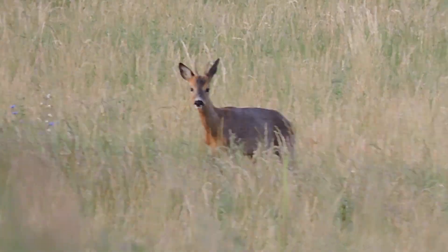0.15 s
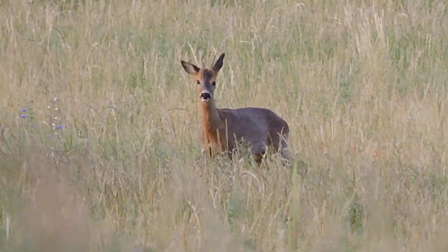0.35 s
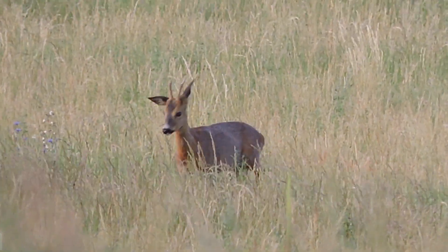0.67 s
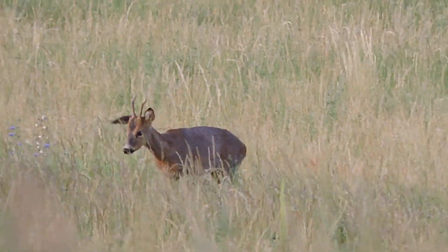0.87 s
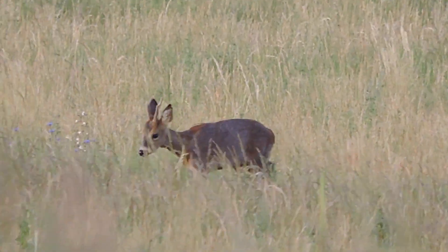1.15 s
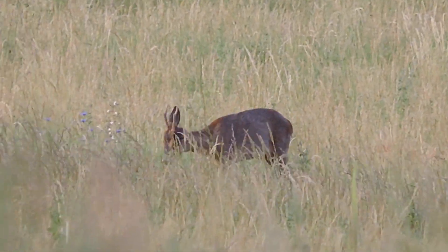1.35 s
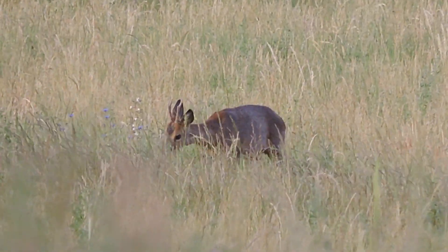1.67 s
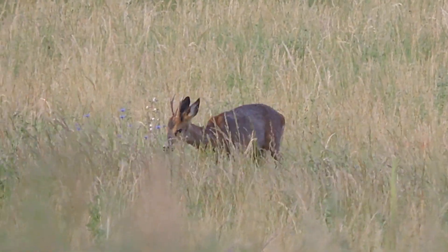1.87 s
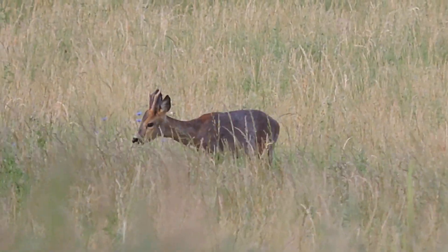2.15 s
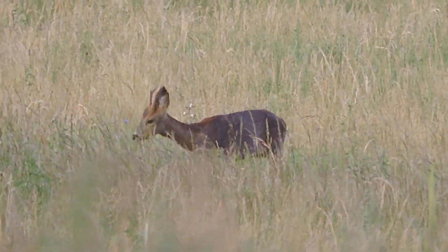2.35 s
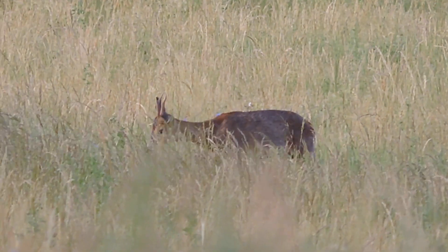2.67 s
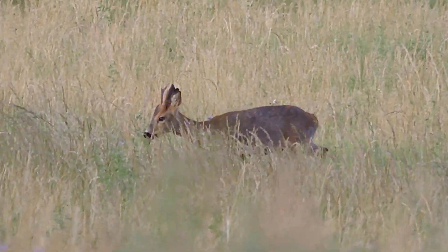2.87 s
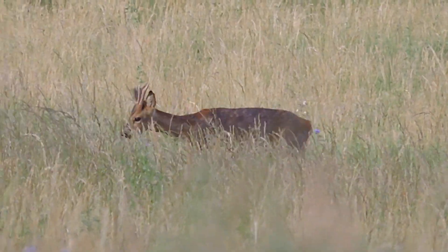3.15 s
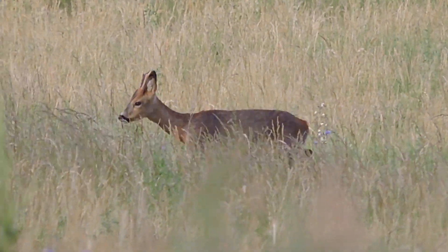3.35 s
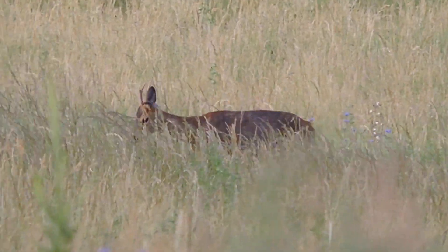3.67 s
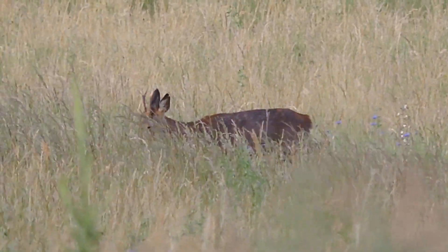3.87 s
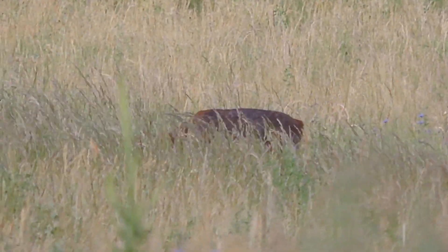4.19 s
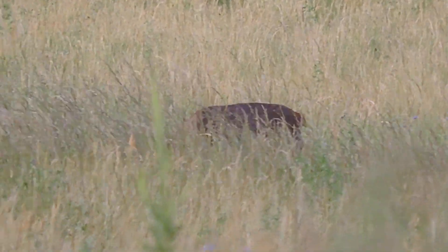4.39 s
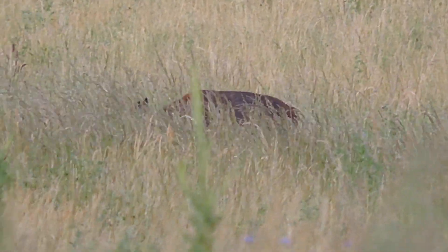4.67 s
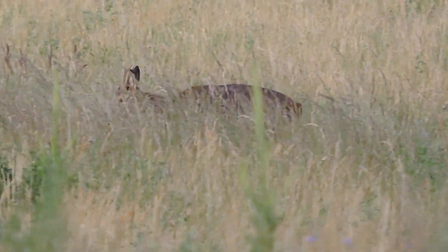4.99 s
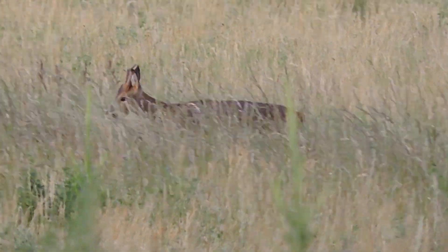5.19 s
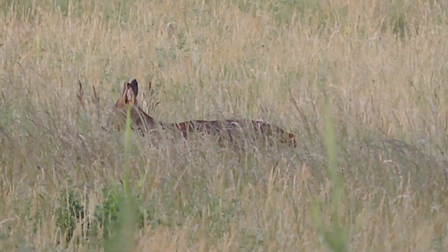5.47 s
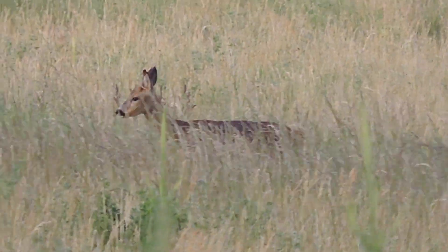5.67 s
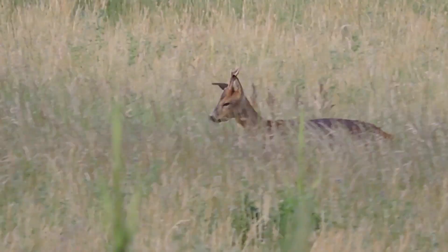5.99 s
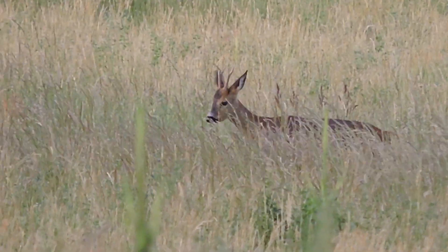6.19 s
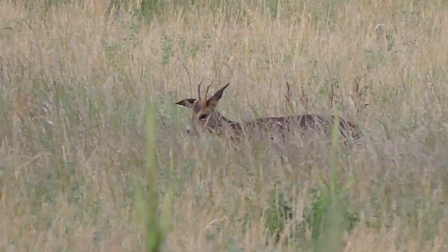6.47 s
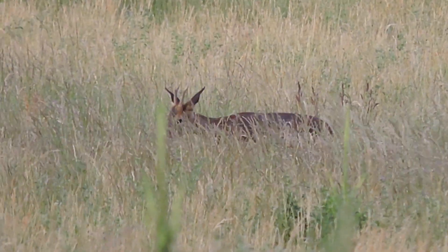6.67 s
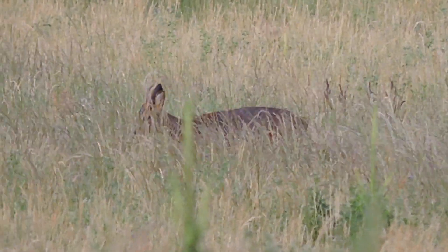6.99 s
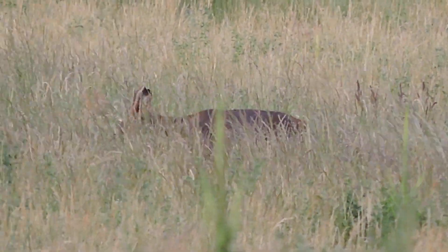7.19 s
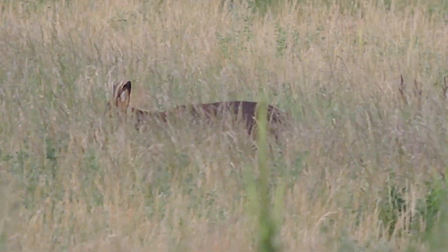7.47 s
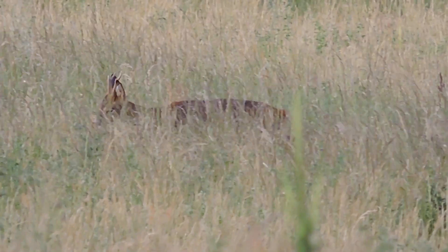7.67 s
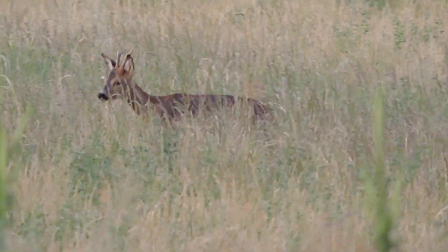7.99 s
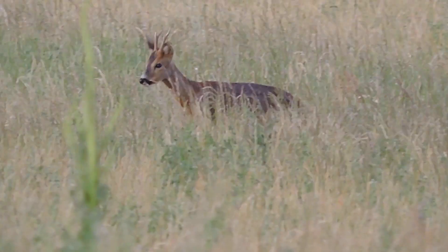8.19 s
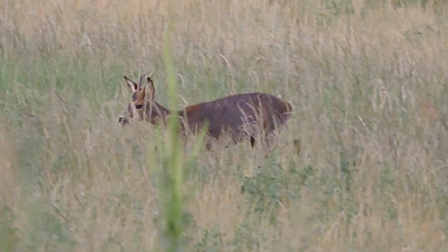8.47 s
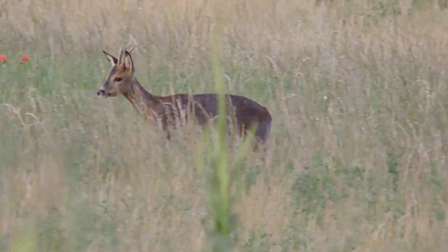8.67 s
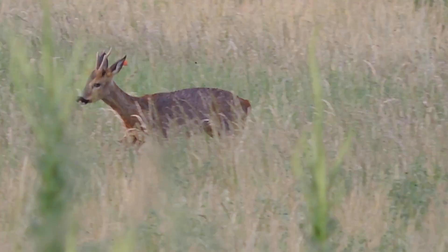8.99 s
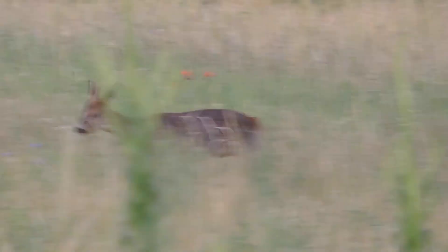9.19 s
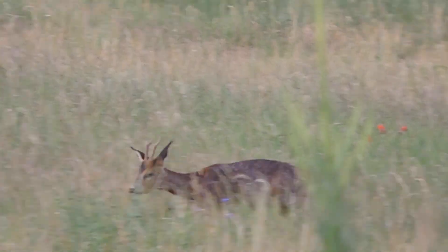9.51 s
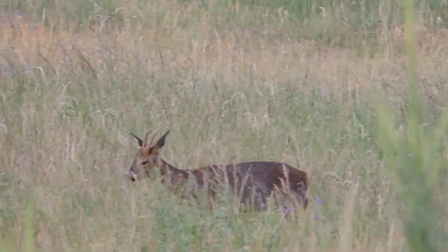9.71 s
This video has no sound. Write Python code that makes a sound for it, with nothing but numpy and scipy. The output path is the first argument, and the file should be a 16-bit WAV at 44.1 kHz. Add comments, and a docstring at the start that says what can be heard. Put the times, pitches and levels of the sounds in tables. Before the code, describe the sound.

Low wind rumble thumps at the microphone and fades to light puffs as crickets chirp rhythmically and a faint far bird calls across open grassland.

```python
"""An open meadow on a summer evening, with a murmur of air, a low distant drone and a faint high tone.
A near field cricket, a fainter neighbour and a far chorus sing: chirps are bursts of whistled wing strokes.
Wind, made of shaped noise, buffets two microphone ports, hard at first and then in light puffs.
A far bird whistles falling notes, and dry grass stems tick as tiny bursts of noise."""
import sys
import numpy as np
from scipy import signal
from scipy.fft import rfft, irfft, next_fast_len
from scipy.io import wavfile

SR = 44100
rng = np.random.default_rng(int(sys.argv[2]) if len(sys.argv) > 2 else 0)


def master(y):
    """Save y as 16-bit WAV."""
    cut = np.clip(np.atleast_2d(y).T, -1, 1)
    pcm = np.round(cut * 32767)  # scale
    wavfile.write(sys.argv[1], SR, pcm.astype(np.int16))


N = 433925   # length in samples

# In stereo columns, a positive left-right value means louder on the left.
# tone colour of the distant murmur: (f/Hz, level/dB per Hz)
AIR_SPECTRUM = [(15, -30), (28, -5.5), (65, 7), (100, 3), (150, -2.5), (200, -4.5), (250, -9), (320, -14),
                (440, -15), (620, -10), (780, -12.5), (1100, -9.5), (1700, -15.5), (4000, -25), (5200, -32),
                (8800, -99)]
# slow swells of the murmur: (t/s, change of level/dB)
AIR_SWELL = [(0, 0.9), (3.2, 0.1), (3.7, 1.5), (4.1, 0.15), (6, 0.86), (7.7, 0.5), (8.15, 1.5), (8.6, 0),
             (9.84, 1)]
# tone colour of the steady high hiss: (f/Hz, level/dB per Hz)
HISS_SPECTRUM = [(2500, -10), (4000, -5), (5500, 2), (7000, 0), (9000, -2), (12000, -4), (16000, -4)]
# how alike the background is at the two ports: (f/Hz, likeness: 1 same, 0 unrelated, -1 opposite)
PORT_LIKENESS = [(60, 3), (280, 0.74), (640, 0.4), (1300, 0.41), (2000, -0.05), (2700, 0), (3800, -0.21),
                 (6000, 0), (15000, 0)]
# stereo balance of the background: (f/Hz, left-right/dB)
PORT_BALANCE = [(60, -2.5), (200, -3.5), (700, -2), (1300, -3.5), (2400, 2.5), (4400, 0.5), (8000, .5),
                (15000, 0.8)]
# rise and fall of the far low drone, like traffic beyond the fields: (t/s, level/dB)
DRONE_LEVELS = [(3.3, -63), (3.83, -55), (4.1, -62.5), (4.3, -53.5), (4.85, -57), (5.15, -64.5),
                (5.35, -53.5), (5.57, -59.5), (6.0, -55), (6.65, -53), (7.4, -60.5), (7.95, -66.5),
                (8.15, -56), (8.7, -61), (9.84, -54.5)]
# tone colour of the drone: (f/Hz, level/dB per Hz)
DRONE_SPECTRUM = [(120, -20), (190, -0.5), (260, 4), (340, -2), (460, -16.5), (620, -8.5), (800, -18.5),
                  (1500, -54)]
# thin high tone and its weaker companions: (f/Hz, rms level before a shared gain/dB)
HIGH_TONES = [(15520, -98), (15570, -84), (15620, -101)]
# dry stems ticking: (t/s, level before filter and shared gain/dB)
GRASS_TICKS = [(1.2376, -67), (1.4491, -64), (2.9811, -69), (7.5946, -63)]

# single far bird chirps: (t/s, length/s, start f/Hz, end f/Hz, level before a shared gain/dB)
SINGLE_CHIRPS = [(.433, 0.039, 1374, 868, -57.5), (1.041, 0.025, 1346, 880, -51.5),
                 (1.071, 0.023, 1740, 1280, -62), (1.408, .06, 1527, 1385, -62.5),
                 (4.249, 0.035, 2200, 1830, -64), (5.673, 0.033, 1250, 1046, -58),
                 (5.665, 0.048, 2560, 2170, -66), (5.697, 0.0287, 2190, 1300, -60),
                 (5.714, .026, 1980, 1150, -57)]
# low note leading into the bird's call: (time ahead of the call/s, length/s, start f/Hz, end f/Hz)
LEAD_IN_NOTE = (.048, 0.056, 1390, 1210)
# slurs of one call: (t into the call/s, length/s, start f/Hz, end f/Hz, level within the call/dB,
# sag: 0 is a straight slide, larger bends sooner)
CALL_SLURS = [(-.025, 0.06, 2700, 2370, -14, .1), (-.002, 0.0367, 1900, 1370, 1, 0.97),
              (0.011, .1, 2300, 1554, -3.5, 2.1)]
# two hoarse notes trailing after it: (t into the call/s, start f/Hz, fall/Hz per s)
TRAILING_NOTES = [(.07, 2070, 1610), (.11, 1512, 1310)]
# the bird's calls, before a shared gain: (t/s, level/dB, lead-in level/dB, length of trailing notes/s,
# upper trailing note level/dB, lower trailing note level/dB)
BIRD_CALLS = [(5.897, -57, -54.5, .24, -64, -68), (6.372, -60, -54.5, 0.15, -70, -63.5),
              (6.857, -64, -63.5, .14, -68, -71), (7.355, -63, -70, 0.17, -70, -71)]

# underlying breeze, fresh at first and then nearly still: (t/s, buffeting before a shared gain/dB, left-right/dB)
BREEZE_LEVELS = [(0, -37, -1), (.65, -37, -8), (1.05, -33, -4.5), (1.7, -33, -3.5), (1.92, -39, -8),
                 (2.35, -33, -10), (2.55, -46, -3), (3.35, -41.5, -2), (3.58, -59.5, 2), (4.5, -52.5, -6),
                 (5.2, -61, -1), (7.4, -53.5, -7), (7.8, -62, -4), (9.84, -48.5, -4)]
# gusts on top of it: (t/s, hold/s, buffeting before a shared gain/dB, left-right/dB)
GUST_EVENTS = [(0.15, 0.17, -26, -13), (0.761, 0.058, -33, -10), (1.216, 0.028, -33, -29),
               (1.463, 0.092, -28.5, -13.5), (1.602, 0.041, -28, -12.5), (2.071, 0.13, -31, -13),
               (2.27, 0.045, -32.5, -14), (2.412, 0.066, -34.5, -13), (2.597, .17, -35, -8),
               (2.974, 0.043, -35, -6), (3.164, 0.065, -37.5, -7), (3.94, 0.072, -49.5, -7),
               (4.538, 0.14, -46, -1), (4.755, 0.11, -47, -1), (6.75, 0.377, -44, -10),
               (7.217, 0.035, -49, -20), (9.179, 0.05, -41.5, 17), (9.427, 0.22, -47, 8),
               (9.619, 0.076, -39.5, 21)]
# tone colour of buffeting at the reference strength: (f/Hz, level/dB per Hz)
BUFFET_SPECTRUM = [(20, -3), (40, 2), (80, 1.5), (130, -3), (200, -6), (300, -18.5), (450, -31),
                   (700, -49.5), (1200, -60)]
# single eddies thumping mostly the right port: (t/s, peak level before a shared gain/dB)
THUMP_EVENTS = [(0.125, -32), (0.159, -27.5), (0.232, -22.5), (0.274, -24.5), (0.338, -26), (1.521, -30.5),
                (1.564, -27.5), (1.636, -28.5), (2.092, -27.5), (2.148, -32), (2.211, -23)]

# neighbour's wing strokes: (time ahead of the last one/s, length/s, level within the chirp/dB)
NEIGHBOUR_WING_STROKES = [(.13, .016, -6), (.1, .018, -4), (.069, .021, -1), (.035, .022, 0), (0, .022, 0)]
# the neighbour slows a little as it sings: (chirp number, t of last stroke/s)
NEIGHBOUR_BEAT = [(0, .08), (4, 1.085), (11, 2.85), (16, 4.115), (21, 5.41), (38, 9.8)]
# near cricket's wing strokes: (time ahead of the last one/s, length/s, level within the chirp/dB)
NEAR_WING_STROKES = [(.085, .012, -5.5), (.061, .017, -1), (.033, .019, 0), (0, .020, .5)]
# its even beat, which shifts now and then: (chirp number, t of last stroke/s)
NEAR_BEAT = [(0, .181), (8, 1.872), (10, 2.333), (13, 2.984), (14, 3.221), (26, 5.676), (34, 7.345),
             (40, 8.613), (46, 9.85)]
# how strongly its song arrives: (t/s, level before a shared gain/dB)
NEAR_LEVELS = [(.2, -67), (1.05, -54.5), (1.5, -54), (2.5, -62.5), (3.35, -60.5), (4.05, -69.5),
               (4.66, -61), (5.3, -66), (6.1, -65.5), (6.6, -57.5), (7.05, -69), (8.0, -65.5), (9.84, -68)]

AIR_DB = -53.5
HOARSE_HZ = 45   # how far the trailing notes' pitch trembles
GUST_REF_DB = -25.5   # wind strength at which the buffeting has its table's tone colour
GUST_ATTACK_S, GUST_RELEASE_S = 0.035, 0.044   # time to swell and to die away by a factor e
CHIRP_SPREAD_DB, STROKE_SPREAD_DB = 1.2, .8   # neighbour's chirps; every cricket's strokes
FIELD_T60_S = 0.37   # time for the scattered tail to fall by 60 dB
PORT_LOW_CUT_HZ, TOP_CUT_HZ = 19.4, 15750


def from_db(db):
    """Turn decibels into a gain."""
    return 10 ** (np.asarray(db) / 20)


def rms_one(x):
    """Scale a sound to an average strength (rms) of 1."""
    return x / np.sqrt(np.mean(x ** 2) + 1e-20)


def in_time(rows):
    """Read each column of a time curve at every sample."""
    s, *columns = np.transpose(rows)
    t = np.arange(N) / SR
    return [np.interp(t, s, column) for column in columns]


def at_hz(points, hz):
    """Read a frequency curve on a logarithmic pitch scale."""
    point_hz, values = np.transpose(points)
    return np.interp(np.log(hz), np.log(point_hz), values)


def drift(rate):
    """Smooth random wandering with spread 1, changing about rate times a second."""
    step = 40   # samples between computed points
    keep = np.exp(-2 * np.pi * rate * step / SR)
    noise = rng.standard_normal(N // step + 2002)
    slow = signal.lfilter([1], [1, -2 * keep, keep ** 2], noise)[2000:]   # drop the filter's start-up
    return np.interp(np.arange(N) / step, np.arange(len(slow)), rms_one(slow))


def band(x, low, high):
    """Keep only the frequencies between low and high."""
    sos = signal.butter(2, [low, min(high, .48 * SR)], "band", fs=SR, output="sos")
    return signal.sosfilt(sos, x)


def half_octaves(count):
    """Give the edges of half-octave bands from 20 Hz upwards."""
    edges = 20 * 2 ** (np.arange(count + 1) / 2)
    return zip(edges, edges[1:])


def panned(pan_db):
    """Left and right gains that keep the total power equal."""
    gains = from_db([pan_db / 2, -pan_db / 2])
    return gains / np.sqrt(np.mean(gains ** 2, axis=0))


def add(out, s, sound):
    """Mix a short sound into a track at time s."""
    i = max(round(s * SR), 0)
    out[..., i:i + sound.shape[-1]] += sound[..., :max(N - i, 0)]


def field(x, wet_db):
    """Add a soft tail scattered by the field and its far edge, different at each port."""
    t = np.arange(int(FIELD_T60_S * SR)) / SR
    fade = from_db(-60 * t / FIELD_T60_S)
    build_up = 1 - np.exp(-t / 0.011)
    tail = rng.standard_normal((2, len(t))) * fade * build_up
    tail /= np.sqrt(np.sum(tail ** 2, axis=1, keepdims=True))
    scattered = signal.fftconvolve(np.atleast_2d(x), tail, axes=1)[:, :N]
    return x + from_db(wet_db) * scattered


def ambience(spectrum):
    """Noise from all around, most alike at both ports in the bass; rms 1."""
    size = next_fast_len(N)
    hz = np.maximum(np.arange(size // 2 + 1) * SR / size, 1)
    mid, side = rfft(rng.standard_normal((2, size)))
    alike = np.clip(at_hz(PORT_LIKENESS, hz), -1, 1)
    ports = np.sqrt(1 + alike) * mid + np.sqrt(1 - alike) * side * [[1], [-1]]
    coloured = ports * from_db(at_hz(spectrum, hz)) * panned(at_hz(PORT_BALANCE, hz))
    return rms_one(irfft(coloured, size)[:, :N])


def murmur():
    """Open country blends into a distant murmur that slowly swells."""
    swell_db, = in_time(AIR_SWELL)
    return from_db(AIR_DB + swell_db + .5 * drift(15.0)) * ambience(AIR_SPECTRUM)


def hiss(level_db):
    """Steady noise lying mostly in the treble."""
    return from_db(level_db) * ambience(HISS_SPECTRUM)


def drone():
    """Low noise, like traffic beyond the fields, rises and falls."""
    level_db, = in_time(DRONE_LEVELS)
    return from_db(level_db + 1.3 * drift(15.0)) * ambience(DRONE_SPECTRUM)


def whine(level_db):
    """A thin high tone throbs as weaker tones 50 Hz to either side beat against it."""
    t = np.arange(N) / SR
    return sum(np.sqrt(2) * from_db(db + level_db) * np.sin(2 * np.pi * hz * t) for hz, db in HIGH_TONES)


def grass(level_db, decay_s, low_hz, high_hz):
    """A dry stem snaps with a tiny bright burst of noise."""
    out = np.zeros((2, N))
    t = np.arange(SR // 20) / SR
    for s, db in GRASS_TICKS:
        burst = np.exp(-t / decay_s) * rng.standard_normal((2, len(t)))
        add(out, s, from_db(db + level_db) * burst)
    return band(out, low_hz, high_hz)


def slur(length, start_hz, end_hz, sag, tremble_hz):
    """A nearly pure falling whistle; sag bends the slide, and a trembling pitch makes it hoarse."""
    u = np.linspace(0, 1, int(length * SR))
    slide = end_hz + (start_hz - end_hz) * (1 - u) * np.exp(-sag * u)
    pitch = slide + tremble_hz * drift(120)[:len(u)]
    swell = np.sqrt(np.abs(np.sin(np.pi * u)))
    return swell * np.sin(2 * np.pi * np.cumsum(pitch) / SR)


def bird(level_db, waver, chirp_sag, chirp_tremble_hz, wet_db):
    """Single chirps and four calls of falling whistles waver on their way across the field."""
    song = np.zeros(N)
    for s, length, start_hz, end_hz, db in SINGLE_CHIRPS:
        add(song, s, from_db(db) * slur(length, start_hz, end_hz, chirp_sag, chirp_tremble_hz))
    ahead, *lead_note = LEAD_IN_NOTE
    for s, call_db, lead_db, trail_s, *trail_dbs in BIRD_CALLS:
        add(song, s - ahead, from_db(lead_db) * slur(*lead_note, sag=0, tremble_hz=0))
        for after, length, start_hz, end_hz, db, sag in CALL_SLURS:
            note = slur(length, start_hz, end_hz, sag, tremble_hz=0)
            add(song, s + after, from_db(call_db + db) * note)
        for (after, hz, fall), db in zip(TRAILING_NOTES, trail_dbs):
            note = slur(trail_s, hz, hz - fall * trail_s, sag=0, tremble_hz=HOARSE_HZ)
            add(song, s + after, from_db(db) * note)
    wavering = song * (1 + waver * drift(48))
    return from_db(level_db) * field(wavering, wet_db) * panned(-1.8)[:, None]


def airflow(unsteady_db):
    """Wind strength at each port: gusts swell, hold and die away over the breeze."""
    t = np.arange(N) / SR
    breeze_db, breeze_pan_db = in_time(BREEZE_LEVELS)
    power = (from_db(breeze_db) * panned(breeze_pan_db)) ** 2
    for s, hold, db, pan_db in GUST_EVENTS:
        away = np.maximum((s - t) / GUST_ATTACK_S, (t - s - hold) / GUST_RELEASE_S)
        shape = np.exp(-np.clip(away, 0, 20))   # full strength during the hold
        power += (from_db(db) * panned(pan_db)[:, None] * shape) ** 2
    return np.sqrt(power) * from_db(unsteady_db * np.array([drift(4.6), drift(6.3)]))


def wind(level_db, db_per_octave, lumpy_db, flutter_db, smallest_hz, unsteady_db):
    """Eddies hit each port separately; faster air makes them smaller, so the rumble rises in pitch."""
    out = np.zeros((2, N))
    for port, strength in zip(out, airflow(unsteady_db)):
        speed = 2 ** ((20 * np.log10(strength) - GUST_REF_DB) / db_per_octave)
        white = rng.standard_normal((2, N))
        eddies = 2 * np.tanh(drift(32) / 2)
        power = 0
        for k, (low, high) in enumerate(half_octaves(count=13)):
            hz = np.sqrt(low * high)
            gain = from_db(at_hz(BUFFET_SPECTRUM, hz / speed))
            burst_db = lumpy_db * min(hz / 250, 1.3) * eddies   # small eddies come in stronger bursts
            uneven = from_db(burst_db + flutter_db * drift(11.0))
            port += band(white[k % 2], low, high) * gain * uneven
            power = power + gain ** 2 * (high - low) / (SR / 2)
        port *= strength / np.sqrt(power)
    # eddies smaller than the port cancel across it
    sos = signal.butter(6, smallest_hz, fs=SR, output="sos")
    return from_db(level_db) * signal.sosfilt(sos, out)


def thumps(level_db, width_s, left_db):
    """An eddy crossing the port pushes and pulls, in either order, within a few milliseconds."""
    out = np.zeros(N)
    for s, db in THUMP_EVENTS:
        u = np.linspace(-4, 4, int(8 * SR * width_s * rng.uniform(.85, 1.15)))
        push_pull = rng.choice([-1, 1]) * u * np.exp((1 - u ** 2) / 2)
        add(out, s, from_db(db + level_db) * push_pull)
    return from_db([[left_db], [0]]) * out


def far_chorus(level_db, low_hz, high_hz):
    """Crickets across the field merge into a faint sheen of noise."""
    return from_db(level_db) * rms_one(band(rng.standard_normal((2, N)), low_hz, high_hz))


def beats(pace):
    """Chirp times, evenly spaced between the points of a pace curve."""
    number, when = np.transpose(pace)
    return np.interp(np.arange(number[-1] + 1), number, when)


def wing_stroke(length, hz, droop_hz, overtone_db):
    """The scraper runs along the file; it slows at the end, so the wing's ring sags in pitch."""
    u = np.linspace(0, 1, int(length * SR))
    pitch = hz - droop_hz * (u + u ** 4) / 2
    phase = 2 * np.pi * (np.cumsum(pitch) / SR + rng.random())
    grip = 1 + 0.26 * np.interp(u, np.linspace(0, 1, 10), rng.standard_normal(10))   # teeth catch unevenly
    ring = np.sin(phase) + from_db(overtone_db) * np.sin(2 * phase)
    return grip * np.sin(np.pi * u) * ring


def chirp(strokes, hz, droop_hz, overtone_db):
    """Give each wing stroke of one chirp as (start s, sound), all slightly different."""
    for ahead, length, db in strokes:
        late, louder, sharper, steeper = rng.standard_normal(4)
        stroke = wing_stroke(length, hz + 25 * sharper, droop_hz * (1 + 0.16 * steeper), overtone_db)
        start = .0005 * late - ahead - length / 2
        yield start, from_db(db + STROKE_SPREAD_DB * louder) * stroke


def neighbour_cricket(hz, droop_hz, overtone_db, level_db, pan_db):
    """A fainter cricket with steeper strokes keeps its own beat, in and out of step with the near one."""
    song = np.zeros(N)
    for s in beats(NEIGHBOUR_BEAT):
        gain = from_db(level_db + rng.normal(0, CHIRP_SPREAD_DB))
        for start, stroke in chirp(NEIGHBOUR_WING_STROKES, hz, droop_hz, overtone_db):
            add(song, s + start, gain * stroke)
    return panned(pan_db)[:, None] * song


def near_cricket(hz, droop_hz, overtone_db, level_db, pan_db, uneven_db):
    """The nearest cricket rubs its wings; its song reaches the left port a little later."""
    song = np.zeros(N)
    times = beats(NEAR_BEAT)
    levels = np.interp(times, *np.transpose(NEAR_LEVELS)) + uneven_db * rng.standard_normal(len(times))
    for s, db in zip(times, levels):
        for start, stroke in chirp(NEAR_WING_STROKES, hz, droop_hz, overtone_db):
            add(song, s + start, from_db(db + level_db) * stroke)
    lag = 7   # samples
    return panned(pan_db)[:, None] * np.array([np.roll(song, lag), song])


def scene():
    """Mix the meadow's background, bird, grass and wind with the crickets."""
    background = murmur() + hiss(level_db=-69.5) + drone() + whine(level_db=-4.0)
    stems = grass(level_db=8.5, decay_s=0.0043, low_hz=3500, high_hz=10900)
    calls = bird(level_db=3.5, waver=0.29, chirp_sag=0.26, chirp_tremble_hz=49.5, wet_db=-5.5)
    gusts = wind(level_db=3.0, db_per_octave=16, lumpy_db=5.5, flutter_db=1.5,
                 smallest_hz=676, unsteady_db=0.67)
    gusts += thumps(level_db=10, width_s=0.00096, left_db=-31)
    chorus = far_chorus(level_db=-79.5, low_hz=4320, high_hz=4810)
    neighbour = neighbour_cricket(hz=5100, droop_hz=836, overtone_db=-9.0, level_db=-72.5, pan_db=-3.0)
    near = near_cricket(hz=4842, droop_hz=370, overtone_db=-24, level_db=1.95, pan_db=5.0, uneven_db=0.64)
    crickets = chorus + neighbour + field(near, wet_db=-14.5)
    return background + stems + calls + gusts + crickets


def record(dry):
    """The microphone sheds the deepest rumble, and the top is cut steeply."""
    low_cut = signal.butter(2, PORT_LOW_CUT_HZ, "high", fs=SR, output="sos")
    top_cut = signal.ellip(12, .1, 80, TOP_CUT_HZ, fs=SR, output="sos")
    return signal.sosfilt(top_cut, signal.sosfilt(low_cut, dry))


dry = scene()
out = record(dry)
master(out)
```